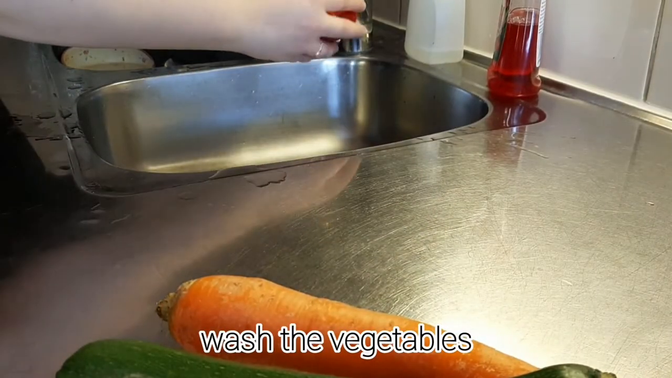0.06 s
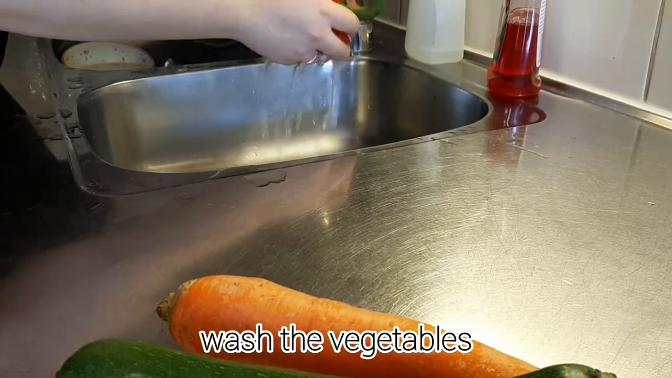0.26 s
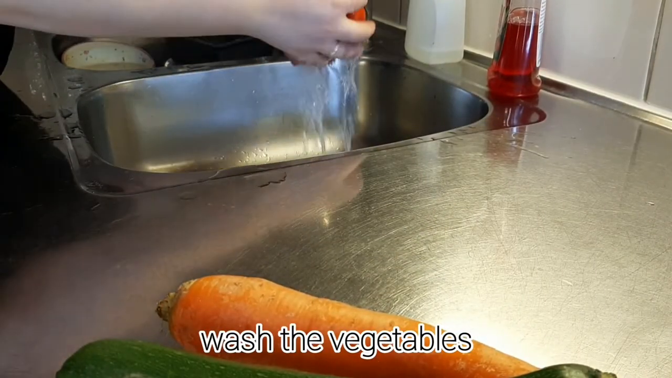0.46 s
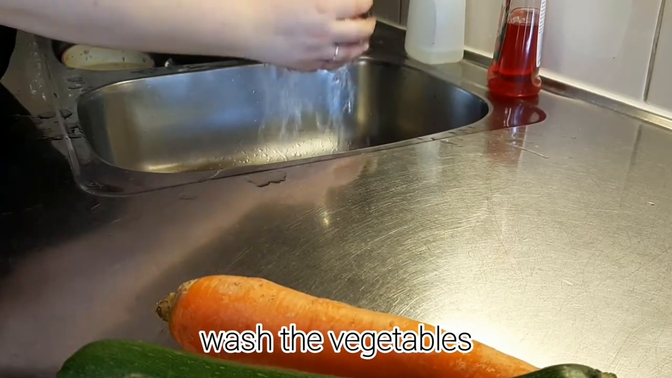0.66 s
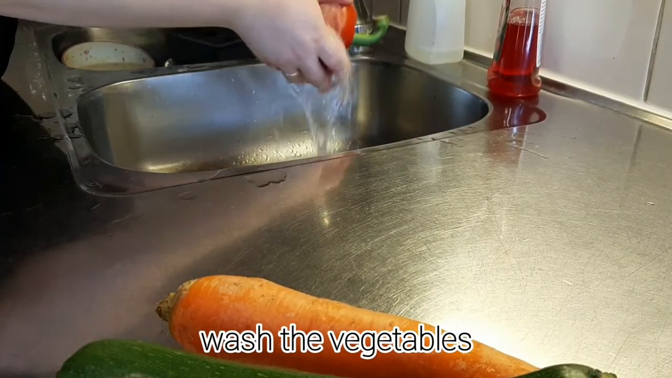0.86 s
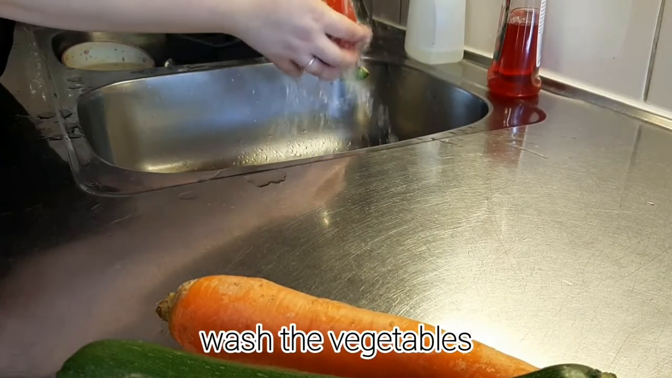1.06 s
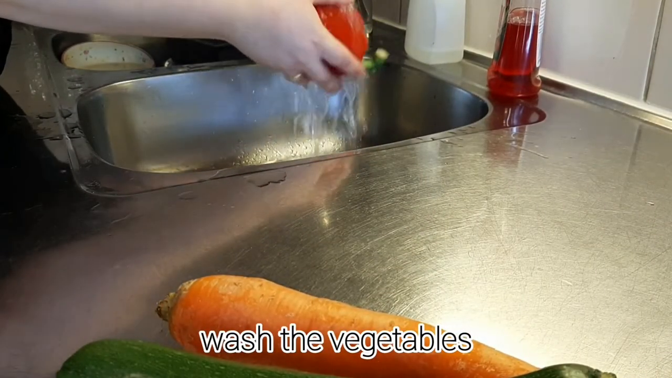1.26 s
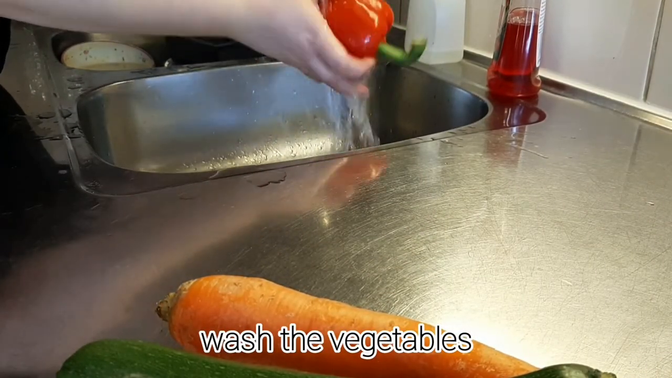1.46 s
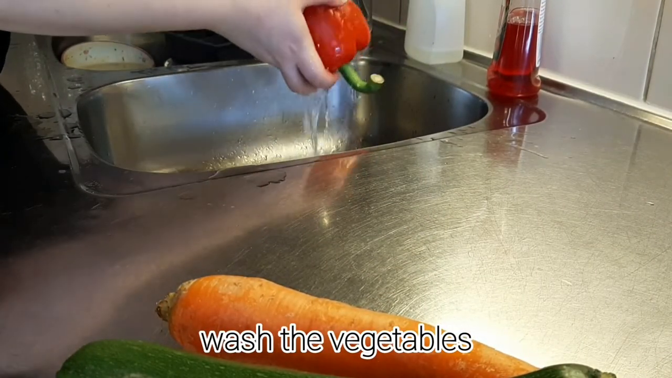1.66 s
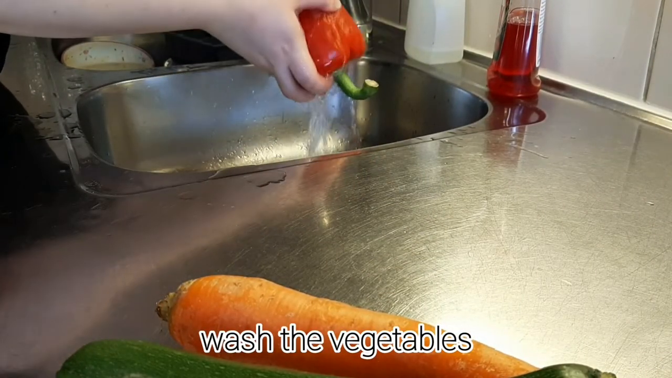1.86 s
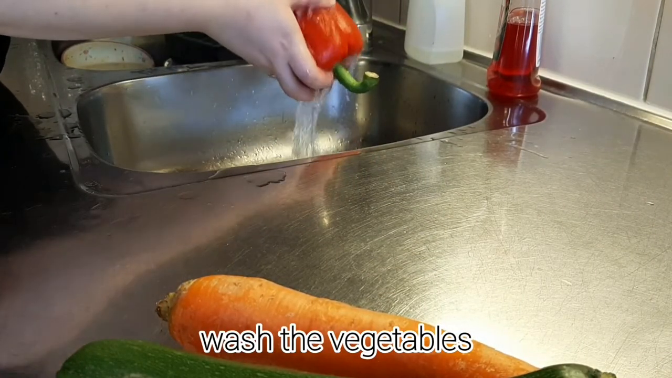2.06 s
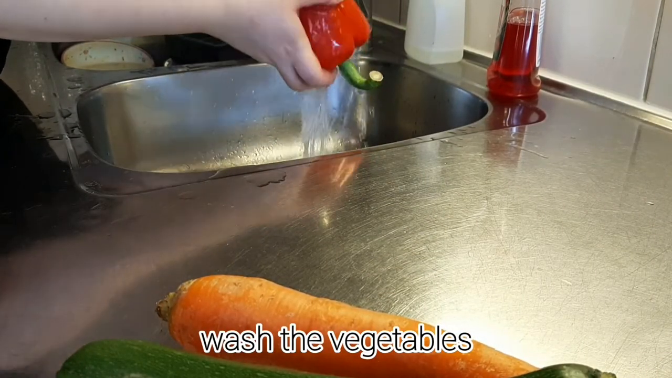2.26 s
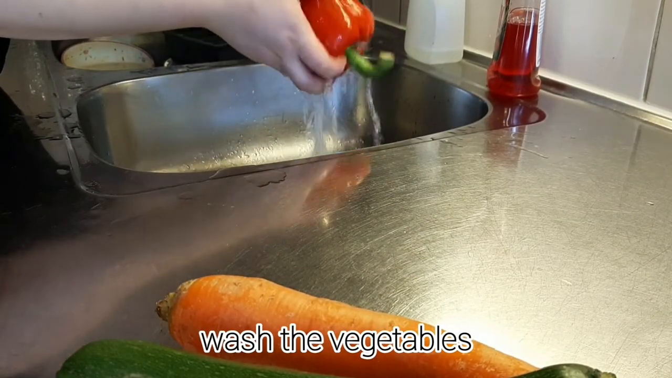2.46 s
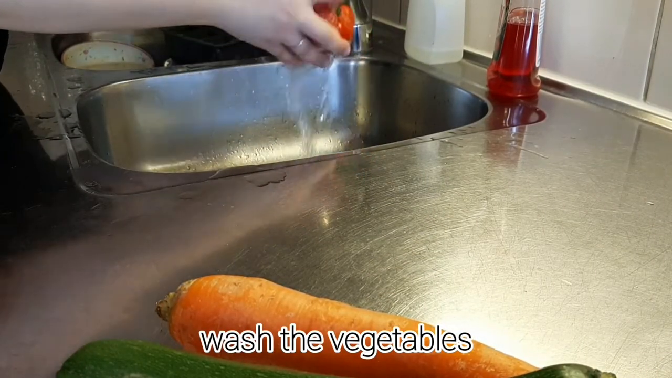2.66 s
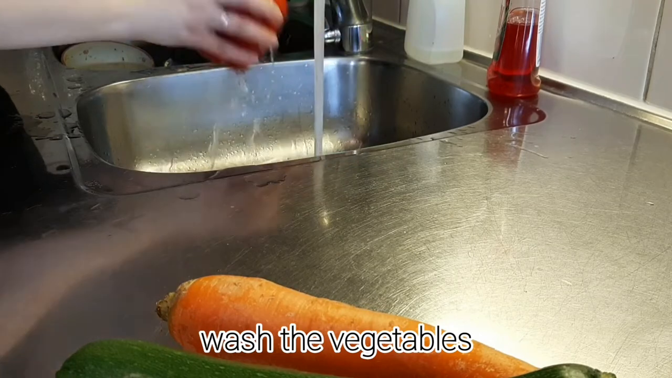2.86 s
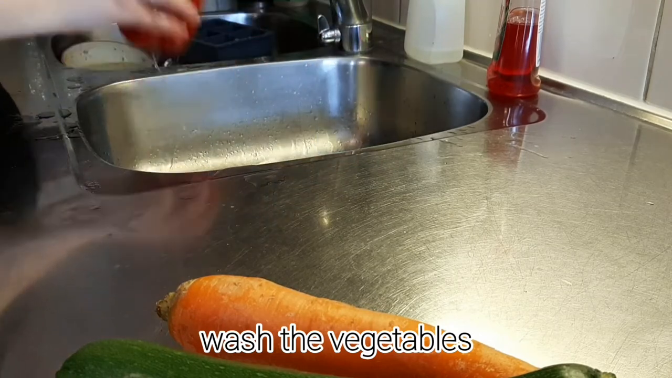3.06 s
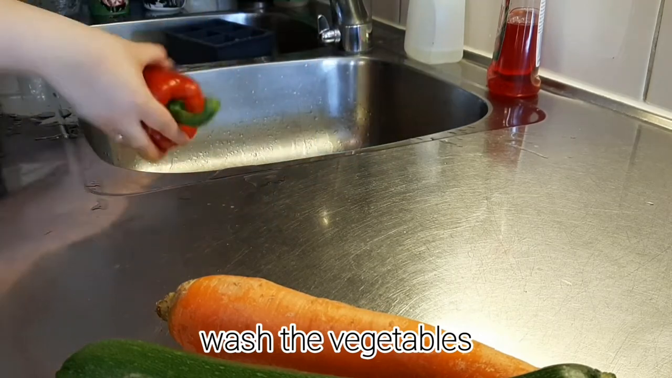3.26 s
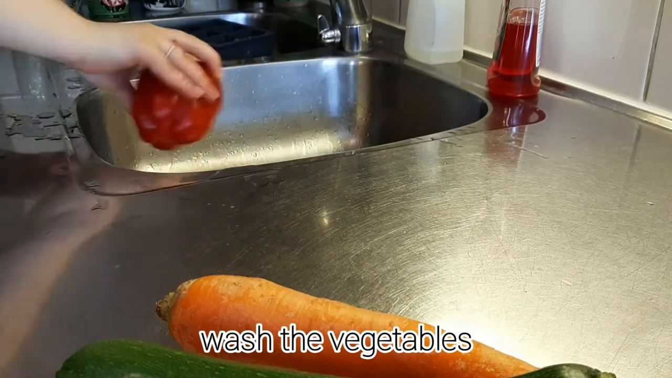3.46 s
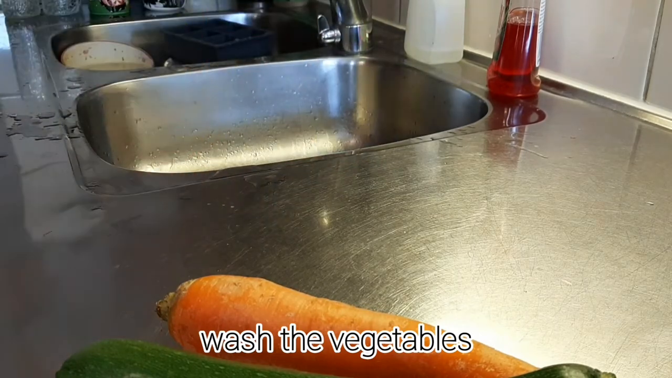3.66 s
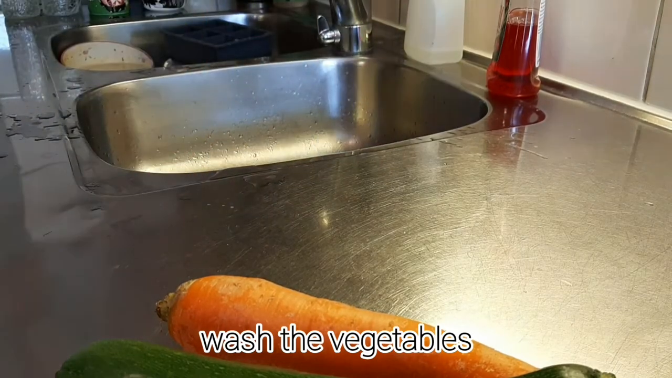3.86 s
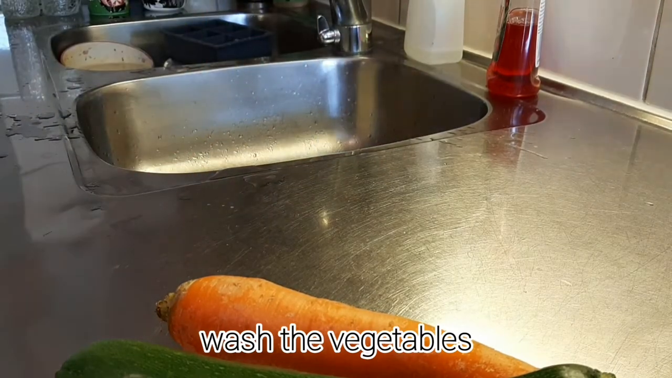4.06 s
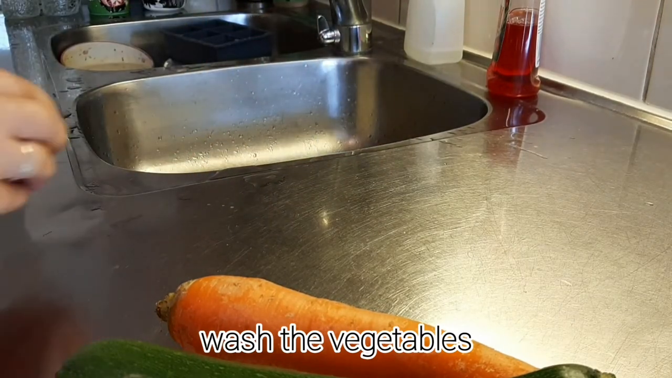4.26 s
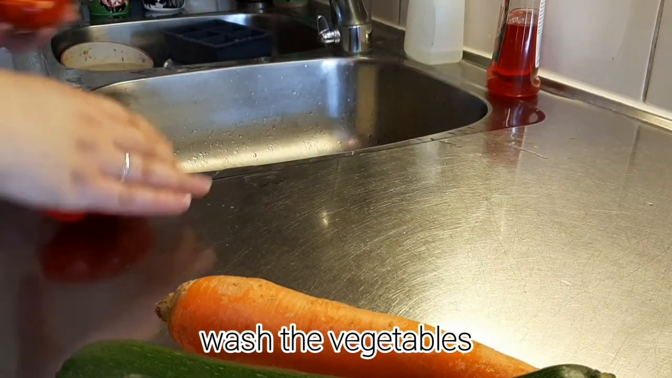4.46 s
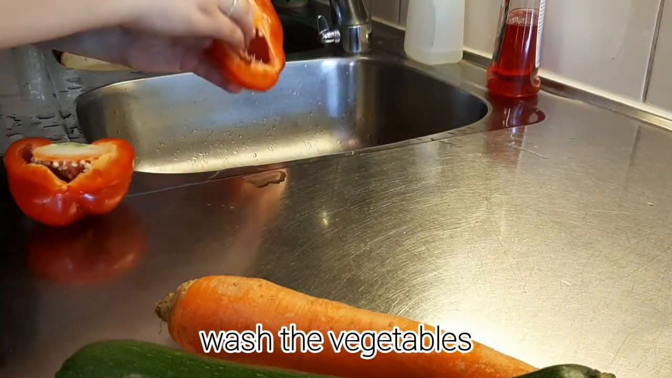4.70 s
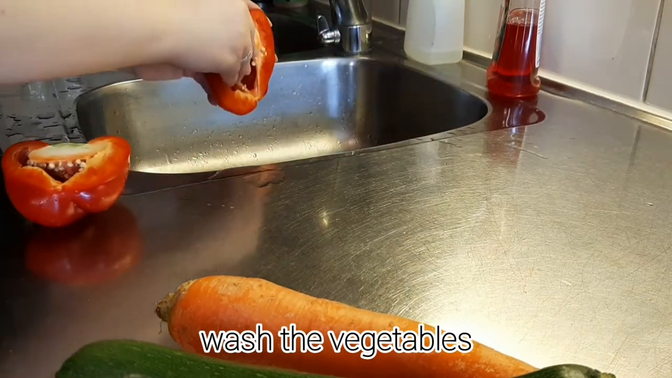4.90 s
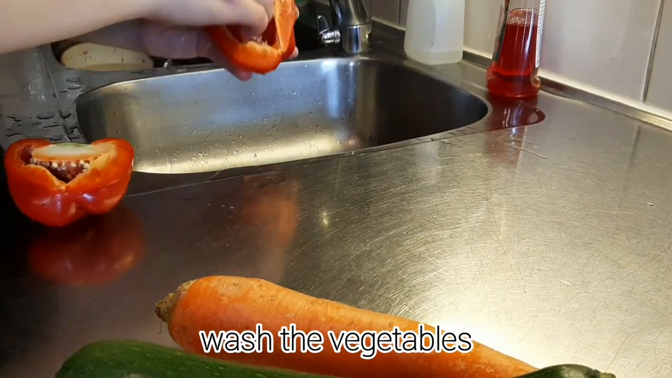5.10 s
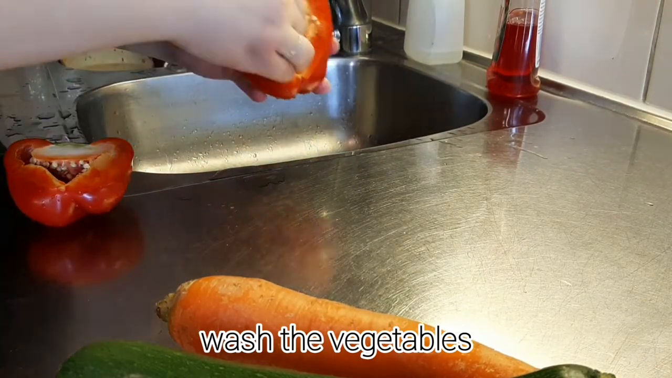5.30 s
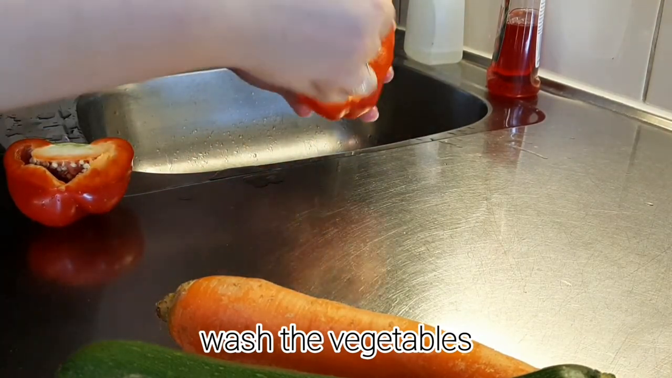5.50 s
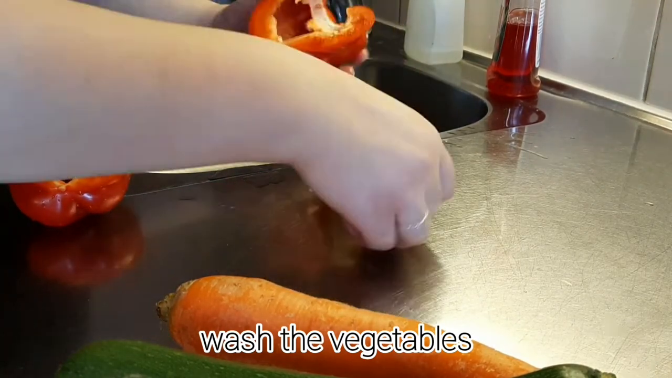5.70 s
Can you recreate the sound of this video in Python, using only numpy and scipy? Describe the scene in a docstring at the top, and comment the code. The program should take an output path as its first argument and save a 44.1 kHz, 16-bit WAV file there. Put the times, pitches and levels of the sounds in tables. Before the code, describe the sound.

Close by, tap water fizzes and splashes off a hand rinsing a pepper, and the steel basin booms hollowly beneath it. After about three seconds the water stops and small drips plink. Wet hands rustle softly, a pepper half lands with a dull thump on a steel counter, and crunchy snaps follow as a core breaks loose. One more thump ends it. An appliance rumbles and whines faintly in the small kitchen.

```python
"""A kitchen tap runs over half a pepper: the aerated jet hisses, drops spatter off the hand, and their
impacts drive the modes of the steel sink. The tap is shut and bubbles ring in the last drips. The pepper
is shaken out and set on the steel counter with a thump; faint whistles follow, among soft rustles and
airy hisses. Flesh fractures as a core is cracked out of the other half, and a last thump follows.
An appliance rumbles and whines faintly throughout."""
import sys
import numpy as np
from scipy import signal
from scipy.fft import rfft, irfft
from scipy.io import wavfile
from scipy.ndimage import uniform_filter1d

SR = 44100
rng = np.random.default_rng(int(sys.argv[2]) if len(sys.argv) > 2 else 0)


def dump_mix(stems):
    """Bounce the given channels to the path in sys.argv[1] as a 16-bit WAV at rate SR."""
    frames = np.atleast_2d(stems).T  # one column per channel
    limited = np.clip(frames, -1, 1)  # hard clip at full scale
    pcm = np.round(limited * 32767).astype(np.int16)
    wavfile.write(sys.argv[1], SR, pcm)


N = 253134
TIME = np.arange(N) / SR

# spectrum of drops bursting on steel: frequency_hz, level_db
SPATTER_SPECTRUM = [(400, -8), (750, -19), (1000, -13), (1400, -6), (1800, -8.5), (2500, -7), (3200, -2.5),
                    (5000, -1.5), (7800, -5), (8800, -12.5), (11700, -11), (16000, -26.5)]
# spectrum of soft rustling: frequency_hz, level_db
RUSTLE_SPECTRUM = [(500, -15), (1300, 11.5), (2200, 11.5), (3200, 9.5), (4000, 10), (5000, 11.5),
                   (7800, 5.5), (8800, -15), (12000, 2), (16000, -50)]
# spectrum of the hollow pepper's breaking flesh: frequency_hz, level_db
FLESH_SPECTRUM = [(300, -45), (600, -20.5), (900, -9), (1250, 3.5), (1550, 0.5), (1750, -5), (2200, -8),
                  (2750, -3.5), (3300, -15.5), (7800, -14.5), (8800, -25), (12000, -25.5), (16000, -48)]


def amp(db):
    """Amplitude ratio of a level in decibels."""
    return 10 ** (np.asarray(db) / 20)


def unit_rms(x):
    """Normalisation to an rms of 1."""
    return x / np.sqrt(np.mean(x ** 2) + 1e-20)


def decay(t, t60):
    """Exponential damping: 60 dB down after t60 seconds."""
    return np.exp(-np.log(1000) * t / t60)


def attack(t, rise_s):
    """First-order rise from 0 towards 1."""
    return 1 - np.exp(-t / rise_s)


def curve_at(points, hz):
    """Interpolation on a logarithmic frequency axis."""
    f, value = np.transpose(points)
    return np.interp(np.log(hz + 1), np.log(f + 1), value)


def add(mix, start_s, sound):
    """Superposition of a sound on the mix, from start_s on."""
    part = mix[:, round(start_s * SR):][:, :sound.shape[-1]]
    part += sound[..., :part.shape[-1]]


def colour(x, spectrum):
    """Minimum-phase filter of unit energy with the given spectral shape."""
    log_gain = np.log(amp(curve_at(spectrum, abs(np.fft.fftfreq(4096, 1 / SR)))))
    taps = np.fft.ifft(np.exp(np.conj(signal.hilbert(log_gain)))).real[:2048]
    return signal.oaconvolve(x, taps[None] / np.linalg.norm(taps), axes=1)[:, :N]


def resonate(x, hz, width_hz):
    """Second-order resonator with a peak gain of 1."""
    q = hz / min(width_hz, SR / 4)
    return signal.lfilter(*signal.iirpeak(min(hz, SR / 2 - 1000), q, SR), x)


def moving_resonance(x, hz, width_hz):
    """Resonator whose natural frequency follows the curve hz."""
    phasor = np.exp(2j * np.pi * np.cumsum(hz) / SR)
    pole = np.exp(-np.pi * width_hz / SR)
    return 2 * (phasor * signal.lfilter([1 - pole], [1, -pole], x * phasor.conj())).real


def drift(rate_hz):
    """Random fluctuation of rms 1, low-passed at rate_hz."""
    rolloff = 1 + (np.fft.rfftfreq(N, 1 / SR) / rate_hz) ** 4
    return unit_rms(irfft(rfft(rng.standard_normal(N)) / rolloff, N))


def correlate(x, coherence):
    """Partial coherence between two independent channels."""
    return np.array([x[0], coherence * x[0] + np.sqrt(1 - coherence ** 2) * x[1]])


def impacts(per_s, spread_db):
    """Poisson train of impulses, a few of them large."""
    size = amp(spread_db * np.minimum(rng.exponential(1, N), 4))
    return size * rng.choice([-1, 1], N) * (rng.random(N) < per_s / SR)


def bursts(hits, t60):
    """Incoherent summation: each impulse starts a dying burst of noise, and their powers add."""
    power = signal.lfilter([1], [1, -decay(2 / SR, t60)], hits ** 2)
    return np.sqrt(power) * rng.standard_normal((2, N))


def splats(rows, t60, gain_db, relative_width, rise_s):
    """Damped band-pass noise, one burst for each row of start_s, level_db, centre_hz."""
    out, t = np.zeros((2, N)), TIME[:SR // 4]
    for start, db, hz in rows:
        band = resonate(rng.standard_normal((2, len(t))), hz, hz * relative_width)
        band = unit_rms(resonate(band, hz, hz * relative_width))
        add(out, start, amp(db + gain_db) * band * attack(t, rise_s) * decay(t, t60))
    return out


def flow(drain_db_per_s=279, open_s=0.074, rise_s=0.029, shut_s=2.998):
    """Envelope of the stream: a linear rise as the tap opens, exponential decay once it is shut."""
    opening = np.clip((TIME - open_s) / rise_s, 0, 1)
    return opening * amp(-drain_db_per_s * np.maximum(TIME - shut_s, 0))


def landing():
    """The point of impact divides the excitation between hand and basin as the pepper is turned."""
    # spatter, drumming and extra boom of the deep modes: time_s, hand_db, basin_db, boom_db
    rinse_levels = [(.1, -56.5, -58.5, -4), (.255, -54, -47, 2), (.295, -41.5, -45, 7),
                    (.41, -47, -43.5, -1), (.52, -41.5, -48.5, 6), (.73, -44, -47, 9.5),
                    (.83, -45.5, -48, -6), (.96, -41, -42, 1.5), (1.03, -44, -49, 0.5),
                    (1.55, -45.5, -45.5, 2), (1.8, -45, -46, -3.5), (1.97, -42, -44.5, -7.5),
                    (2.24, -49, -46, -4.5), (2.33, -41.5, -47.5, 1.5), (2.519, -45, -46, 8.5),
                    (2.78, -43, -48.5, 1), (2.85, -37.5, -44.5, -0.5), (3.0, -42.5, -49, 4)]
    times, *levels = np.transpose(rinse_levels)
    return [np.interp(TIME, times, db) for db in levels]


def appliance(rumble_db=-47, air_db=-66, whine_db=-69.5, whine_hz=1532, waver_hz=11):
    """Broadband noise and a modulated tone: low rumble, a soft rush of air and a thin wavering whine."""
    # spectrum of the rumble: frequency_hz, level_db
    rumble_spectrum = [(20, -30), (50, -15), (80, -14.5), (107, 0), (135, -7), (170, -13.5), (210, -19.5),
                       (240, -14.5), (320, -29.5), (480, -34.5), (650, -52), (2000, -65.5)]
    # spectrum of the moving air: frequency_hz, level_db
    air_spectrum = [(300, 11), (800, -11), (1120, -11.5), (1260, 3.5), (1450, 1.5), (1750, -8),
                    (3000, -11.5), (6000, -10), (8800, -30), (12000, -14.5), (16000, -32.5)]
    rumble, air = rng.standard_normal((2, 2, N))
    rumble_gain = amp(curve_at(rumble_spectrum, np.fft.rfftfreq(N, 1 / SR)))
    rumble = irfft(rfft(correlate(rumble, 0.98)) * rumble_gain, N)
    cycles = np.cumsum(whine_hz + waver_hz * np.array([drift(15.7), drift(18.6)]), axis=1) / SR
    whine = np.sin(2 * np.pi * cycles) * amp(-0.6 * drift(25))
    air = amp(air_db + drift(3)) * unit_rms(colour(air, air_spectrum))
    return amp(rumble_db) * unit_rms(rumble) + air + amp(whine_db) * unit_rms(whine)


def pats(upper_db=-22, upper_ratio=1.8):
    """Soft gurgles and pats of wet hands each excite two broad resonances."""
    # soft wet sounds: start_s, level_db, centre_hz
    lower = [(0.06, -46, 1440), (3.155, -58.5, 820), (3.214, -54, 1190), (3.282, -50, 1170),
             (3.397, -50.5, 1000), (3.73, -46.5, 1000), (4.085, -49, 510), (4.39, -50, 432),
             (4.946, -46.5, 780), (4.948, -44, 1310)]
    upper = [(start, db + upper_db, hz * upper_ratio) for start, db, hz in lower]
    return splats(lower + upper, t60=0.17, gain_db=-1, relative_width=0.55, rise_s=0.0069)


def spatter(gain_db=6.5, drops_per_s=900, surge_db=3.5, surge_hz=28, bubble_db=-8.5):
    """Impact noise: drops of each size burst on the steel in clumps; small bubbles resonate among them."""
    splashes, bubbles, t = np.zeros((2, N)), np.zeros((2, N)), TIME[:SR // 40]
    for hz in np.geomspace(900, 15000, 9):
        hits = impacts(drops_per_s, spread_db=6.5)
        hits *= amp(surge_db * drift(surge_hz))  # water surges as it breaks over the fingers
        splashes += np.sqrt(hz) * unit_rms(resonate(bursts(hits, t60=0.085), hz, hz / 2))
    for hz in np.geomspace(2400, 7500, 24):
        cycles = hz * t * (1 + 2.5 * t)  # the pitch rises as the bubble nears the surface
        ring = np.sin(2 * np.pi * cycles) * np.exp(-cycles / 9)
        angle = rng.uniform(0, 2 * np.pi)
        pan = np.array([[np.cos(angle)], [np.sin(angle)]])
        bubbles += signal.oaconvolve(impacts(per_s=14, spread_db=3.5), ring)[:N] * pan
    wet = unit_rms(colour(splashes, SPATTER_SPECTRUM)) + amp(bubble_db) * unit_rms(bubbles)
    hand_db, _, _ = landing()
    return amp(gain_db + hand_db) * unit_rms(wet) * flow()


def spray(gain_db=-27.5, spit_db=-5, db_per_spatter_db=0.68):
    """Shot noise: dense tiny impulses merge into the fizz of the aerated jet, and sparser ones spit."""
    # spectrum of the fine spray: frequency_hz, level_db
    spray_spectrum = [(2000, 15.5), (5000, -30.5), (7800, -41), (8800, 0.5), (11500, 14), (16000, 12)]
    fizz = np.array([impacts(per_s=11000, spread_db=11), impacts(per_s=7000, spread_db=0.6)])
    fizz *= amp(0.5 * drift(58))
    spits = bursts(impacts(per_s=150, spread_db=4), t60=0.11)
    jet = colour(unit_rms(fizz) + amp(spit_db) * unit_rms(spits), spray_spectrum)
    hand_db, _, _ = landing()
    return amp(gain_db + db_per_spatter_db * hand_db) * unit_rms(jet) * flow()


def drumming(gain_db=1, drops_per_s=500, coherent_below_hz=900, wander_db=1.95, boom_hz=(220, 480)):
    """Forced vibration: falling water drives the basin's modes, and a stream on its middle booms."""
    # modes of the steel basin: frequency_hz, width_hz, level_db
    basin_modes = [(132, 26.5, 13.5), (181.6, 17, 6.5), (243.3, 30, 2.5), (343.3, 25, 0.5), (374, 12, 0),
                   (421.3, 10, -0.5), (545.7, 15.4, 5.5), (584, 16, -2.5), (701.4, 24, 3), (737.4, 10.5, 7),
                   (869, 42, -15), (1310, 130, -4), (1494, 70, -0.5), (2028, 64, 3.5), (2182, 39, -6)]
    hits = np.array([impacts(drops_per_s, spread_db=1.53) for _ in range(2)])
    groups = np.zeros((2, 2, N))
    detune = 1 + 0.004 * drift(5)  # the film of water shifts the modes
    for hz, width_hz, db in basin_modes:
        drive = correlate(hits, 1 / (1 + (hz / coherent_below_hz) ** 4))
        drive *= amp(db + wander_db * drift(7))
        is_deep = boom_hz[0] < hz < boom_hz[1]
        groups[int(is_deep)] += moving_resonance(drive, hz * detune, width_hz)
    rest, deep = groups / np.std(groups.sum(0))
    _, basin_db, boom_db = landing()
    run_off = flow(drain_db_per_s=81)  # water from the hand drums on a little longer
    return amp(gain_db + basin_db) * (rest + amp(boom_db) * deep) * run_off


def valve():
    """The valve sings as it opens: noise through a narrow resonance."""
    # note of the valve: start_s, level_db, centre_hz
    opening = [(0.078, -47, 2250)]
    return splats(opening, t60=0.87, gain_db=-3, relative_width=0.18, rise_s=0.0083)


def slaps():
    """Gushes strike the steel: impact noise with a sharp onset and a fast decay."""
    # gushes of water: start_s, level_db, centre_hz
    gushes = [(.262, -40, 380), (.2851, -33, 9600), (.335, -36, 830), (.3093, -23.5, 3700),
              (.4747, -32.5, 2120), (.6248, -27.5, 4500), (.6513, -26.5, 4050), (.674, -24.5, 4700),
              (.731, -24, 4850), (.7635, -18.5, 3970), (.954, -28, 290), (.974, -36.5, 340),
              (.976, -37, 760), (1.056, -29, 3100), (1.0798, -27, 3220), (1.3273, -29, 3300),
              (1.35, -34.5, 790), (1.527, -34, 12200), (1.604, -26.5, 5300), (1.941, -26, 3060),
              (2.1025, -30, 4960), (2.135, -30, 3280), (2.1698, -29.5, 4600), (2.461, -25.5, 3480),
              (2.5455, -23, 5100), (2.6206, -23, 3730), (2.9735, -27, 5240), (2.992, -23, 3550),
              (3.048, -47, 12200), (3.165, -61, 12200), (3.183, -55, 12200), (3.215, -67, 12200)]
    return splats(gushes, t60=0.067, gain_db=-3, relative_width=0.53, rise_s=0.00088)


def trickle(start_s=3.07, level_db=-62.5, fade_db_per_s=24, droplets_db=-9):
    """Bubbles resonate in the run-off among droplets from the hand, fading as the basin empties."""
    bubbles, t = np.zeros((2, N)), TIME[:SR // 25]
    for hz in np.geomspace(700, 2700, 16):
        cycles = hz * t * (1 + 2 * t)
        ring = np.sin(2 * np.pi * cycles) * np.exp(-cycles / 11) / np.sqrt(hz)
        births = np.array([impacts(per_s=18, spread_db=2) for _ in range(2)])
        bubbles += signal.oaconvolve(births, ring[None], axes=1)[:, :N]
    droplets = colour(bursts(impacts(per_s=70, spread_db=2), t60=0.063), SPATTER_SPECTRUM)
    age = np.maximum(TIME - start_s, 0)
    envelope = (age > 0) * amp(level_db - fade_db_per_s * age)
    return (unit_rms(bubbles) + amp(droplets_db) * unit_rms(droplets)) * envelope


def drips(gain_db=-3, t60=0.076, chirp_per_s=0.9, rise_s=0.0024):
    """Bubble resonance: each drip splashes and traps air that rings with rising pitch."""
    # drips into the wet basin after the tap is shut: start_s, level_db, pitch_hz
    falls = [(3.128, -58.5, 1700), (3.136, -47, 1300), (3.195, -49, 1000), (3.204, -49, 1200),
             (3.21, -61, 2080), (3.268, -62, 2867), (3.287, -58, 2450), (3.372, -58, 2200),
             (3.388, -55, 2070), (3.402, -52.5, 500), (3.503, -54.5, 570), (3.822, -54, 530)]
    bubbles, t = np.zeros((2, N)), TIME[:SR // 10]
    for start, db, hz in falls:
        ring = np.sin(2 * np.pi * hz * t * (1 + chirp_per_s * t))
        add(bubbles, start, amp(db + gain_db) * ring * attack(t, rise_s) * decay(t, t60))
    return bubbles + splats(falls, t60, gain_db=-5, relative_width=0.35, rise_s=rise_s)


def rustles(gain_db=-3, grain_db=1.5, wander_db=2, swell_s=0.025, fade_s=0.055, lead_s=0.008):
    """Modulated noise: soft rustles and faint airy hisses swell and fade, each with two resonances."""
    # rustles and hisses: start_s, end_s, level_db, resonance_hz
    swells = [(3.566, 3.639, -62, 3600), (3.644, 3.76, -64.5, 1520), (3.775, 3.83, -67, 3480),
              (3.844, 3.882, -62.5, 4000), (4.078, 4.107, -72, 3420), (4.367, 4.392, -60.5, 4060),
              (4.448, 4.627, -66.5, 3030), (4.781, 5.037, -70, 5100), (5.041, 5.2, -59, 2930),
              (5.387, 5.415, -63.5, 4420), (5.594, 5.647, -72.5, 4750)]
    out = np.zeros((2, N))
    for start, end, db, hz in swells:
        length_s = end - start + lead_s
        t = TIME[:round((length_s + 4 * fade_s) * SR)]
        grains = rng.standard_normal((2, len(t)))
        lower = unit_rms(resonate(grains, hz, hz * 0.2))
        upper = amp(-3) * unit_rms(resonate(grains, hz * 1.55, hz * 0.2))
        rustle = unit_rms(colour(grains, RUSTLE_SPECTRUM)[:, :len(t)])
        swell = np.sin(np.pi / 2 * np.minimum(t / swell_s, 1)) ** 2
        fade = np.exp(-2 * np.maximum(t - length_s, 0) / fade_s)
        add(out, start - lead_s, amp(db + gain_db) * swell * fade * (rustle + unit_rms(lower + upper)))
    return out * amp(grain_db * drift(70) + wander_db * drift(6.8))


def ticks():
    """Very short broadband transients, heard as small sharp ticks."""
    # ticks: start_s, level_db, centre_hz
    transients = [(3.585, -41, 6300), (3.777, -40.5, 2200), (3.785, -43, 2450), (5.002, -51.5, 11000)]
    return splats(transients, t60=0.011, gain_db=-0.5, relative_width=2.2, rise_s=0.00035)


def thumps(body_db=1, clatter_db=-5, clatter_hz=1500, squash_s=0.0015, lowest_hz=40):
    """Soft contact low-passes a blow, which rings the object, the counter's modes and a dense clatter."""
    # contacts on the counter: start_s, level_db, cutoff_hz, object_pitch_hz
    contacts = [(4.41, -29, 149, 68), (4.414, -43, 1690, 199), (4.4226, -31.5, 600, 328),
                (4.433, -30.5, 234, 70.4), (4.443, -44, 400, 109), (5.65, -38, 110, 133),
                (5.668, -24, 350, 156), (5.67, -30, 1510, 796), (5.6756, -25, 1510, 481),
                (5.696, -32.5, 300, 277)]
    # modes of the steel counter: frequency_hz, level_db, t60_s
    counter_modes = [(85, -19.5, 0.093), (112.6, 1, 0.068), (177, -6.5, 0.085), (286, -2.5, 0.045),
                     (343.3, -8.5, 0.12), (535, -4, 0.048), (619, -1, 0.068), (751, -6.5, 0.083),
                     (849, -2.5, 0.047), (1000, -18, 0.14), (1297, -8, 0.075), (1470, -9, 0.067),
                     (1544, -3.5, 0.053), (2022, -11.5, 0.1)]
    out, t = np.zeros((2, N)), TIME[:SR // 3]
    ring = sum(amp(db) * np.sin(2 * np.pi * hz * t) * decay(t, t60) for hz, db, t60 in counter_modes)
    for start, db, cutoff_hz, body_hz in contacts:
        noise = correlate(rng.standard_normal((2, len(t))), 0.12)
        clatter = unit_rms(signal.lfilter(*signal.butter(1, clatter_hz, fs=SR), noise))
        body = amp(body_db) * np.sin(2 * np.pi * body_hz * t) * decay(t, t60=0.088)
        blow = ring + body + amp(clatter_db) * clatter * decay(t, t60=0.16)
        blow *= attack(t, squash_s)  # the flesh gives before it pushes
        add(out, start, amp(db) * signal.lfilter(*signal.butter(1, cutoff_hz, fs=SR), blow))
    return signal.lfilter(*signal.butter(2, lowest_hz, "high", fs=SR), out)


def whistles(gain_db=-1.5, width_hz=110, waver_depth=0.015):
    """Narrow-band noise: a wavering resonance swells and fades, heard as a faint whistle."""
    # faint whistles after the first thump: start_s, end_s, level_db, pitch_hz
    notes = [(4.457, 4.516, -60, 2000), (4.472, 4.505, -66, 3100), (4.477, 4.51, -65, 4660),
             (4.519, 4.555, -69, 3030), (4.549, 4.635, -73, 4970), (4.553, 4.663, -67, 3300)]
    out = np.zeros((2, N))
    waver = 1 + waver_depth * drift(30)
    for start, end, db, hz in notes:
        pitch = hz * waver[round(start * SR):round(end * SR)]
        tone = unit_rms(moving_resonance(rng.standard_normal((2, len(pitch))), pitch, width_hz))
        add(out, start, amp(db + gain_db) * tone * np.sqrt(np.hanning(len(pitch))))
    return out


def snaps(crack_db=15, crunch_db=-10, rib_db=-12, grain_db=4, right_lag_s=0.00022):
    """Brittle fracture: an impulse and bursting cells give a hollow body, a bright edge, a ringing rib."""
    # breaks in the pepper's flesh: start_s, level_db, treble_db, rib_pitch_hz
    fractures = [(5.047, -44, 0.5, 1070), (5.07, -41.5, -0.5, 2010), (5.1018, -25, -21, 2655),
                 (5.116, -34, -16, 3950), (5.1389, -27.5, -31, 2920), (5.174, -34, -11, 1290),
                 (5.183, -21.5, -24, 1506), (5.189, -29, -13, 3140), (5.305, -50, -11, 2420),
                 (5.354, -56, -25, 2160)]
    # spectrum of the bright edge: frequency_hz, level_db
    edge_spectrum = [(1250, -12), (5000, 0), (7800, -2), (8800, -6), (12000, -4), (16000, -12)]
    body, edge, ribs = np.zeros((3, 2, N))
    t = TIME[:SR // 5]
    crack = np.array([t == 0, t == t[round(right_lag_s * SR)]])
    for start, db, treble_db, hz in fractures:
        cells = unit_rms(rng.standard_normal((2, len(t))) * amp(grain_db * drift(400)[:len(t)]))
        crunch = amp(crunch_db) * cells * decay(t, t60=0.082)
        bright = (cells * np.exp(-t / 0.003) + crunch) * attack(t, rise_s=0.001)
        add(body, start, amp(db) * (amp(crack_db) * crack + crunch))
        add(edge, start, amp(db + treble_db) * bright)
        add(ribs, start, amp(db + rib_db) * np.sin(2 * np.pi * hz * t) * decay(t, t60=0.042))
    return colour(body, FLESH_SPECTRUM) + colour(edge, edge_spectrum) + ribs


def crackle(tears_per_s=170, skin_db=-3):
    """Acoustic emission: small fibres keep tearing between and after the snaps."""
    # envelope of the tearing as the core is pulled free: time_s, level_db
    tearing = [(5.05, -57), (5.12, -50), (5.2, -51), (5.26, -66.5), (5.31, -67), (5.4, -65.5), (5.46, -88)]
    times, db = np.transpose(tearing)
    tears = bursts(impacts(tears_per_s, spread_db=3), t60=0.072)
    flesh = unit_rms(colour(tears, FLESH_SPECTRUM))
    skin = amp(skin_db) * unit_rms(colour(tears, RUSTLE_SPECTRUM))
    return (flesh + skin) * amp(np.interp(TIME, times, db)) * (TIME > times[0]) * (TIME < times[-1])


def reverberation(x, patterns=3):
    """Diffuse reflections: random cross-fades of decaying tails shift the pattern, as moving sources do."""
    # reverberation time of the kitchen: frequency_hz, t60_s
    room_t60 = [(100, 0.034), (500, 0.11), (2000, 0.13), (6000, 0.035), (16000, 0.011)]
    out = np.zeros((2, N))
    shares = np.array([drift(6) for _ in range(patterns)])
    for share in shares / np.linalg.norm(shares, axis=0):
        hz, t, noise = signal.stft(rng.standard_normal((2, SR // 3)), SR, nperseg=128)
        damping = decay(t, curve_at(room_t60, hz)[:, None])
        _, tail = signal.istft(noise * damping, SR, nperseg=128)
        out += signal.oaconvolve(x * share, tail / np.linalg.norm(tail[0]), axes=1)[:, :N]
    return out


def scene(water_room_db=-11, hand_room_db=-9, thump_room_db=-12):
    """Direct sound and reflections of water, hands and counter superpose in a small tiled kitchen."""
    water = spatter() + spray() + drumming() + trickle() + slaps()
    valve_note = valve()
    small_sounds = snaps() + crackle() + whistles() + rustles() + pats() + drips()
    knocks = thumps()
    into_room = amp(water_room_db) * water + amp(hand_room_db) * small_sounds + amp(thump_room_db) * knocks
    return water + valve_note + small_sounds + knocks + reverberation(into_room) + ticks() + appliance()


def record(dry, dip_s=3.767, dip_length_s=0.008, dip_db=-12, cutoff_hz=15950):
    """Linear filtering: each microphone port has its own colour; the level dips once; a low-pass follows."""
    # response of the left port: frequency_hz, gain_db
    left_port = [(200, 0.5), (400, 3.5), (2500, -5), (4500, -3.5), (7500, -4), (10000, -1.5), (14000, 7.5)]
    # response of the right port: frequency_hz, gain_db
    right_port = [(200, 5.5), (400, 5.5), (2500, -2), (4500, -5.5), (6000, -11.5), (7600, -23.5),
                  (8400, -59), (9300, -14.5), (10200, -12), (12000, -4.5), (16000, 12.5)]
    hz = np.fft.rfftfreq(2 * N, 1 / SR)
    response = amp([curve_at(left_port, hz), curve_at(right_port, hz)])
    heard = irfft(rfft(dry, 2 * N) * response)[:, :N]
    in_dip = abs(TIME - dip_s - dip_length_s / 2) < dip_length_s / 2
    heard *= amp(dip_db * uniform_filter1d(in_dip.astype(float), size=100))
    low_pass = signal.firwin(511, cutoff_hz, window=("kaiser", 9), fs=SR)
    return signal.oaconvolve(heard, low_pass[None], "same")


dry = scene()
out = record(dry)
dump_mix(out)
```